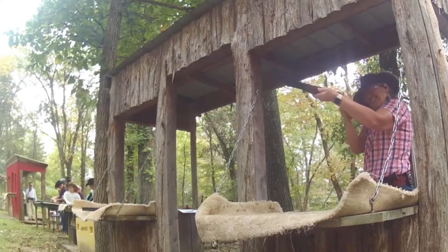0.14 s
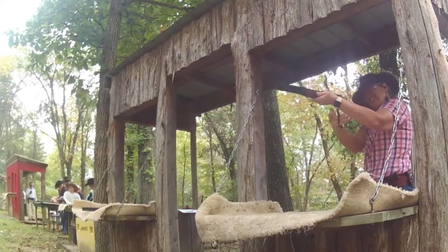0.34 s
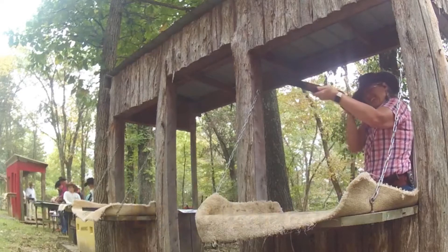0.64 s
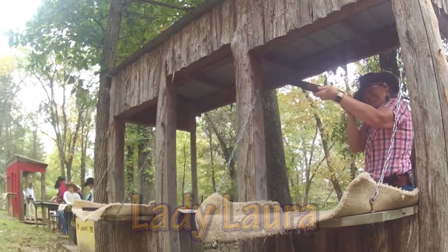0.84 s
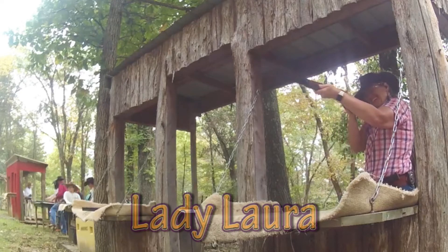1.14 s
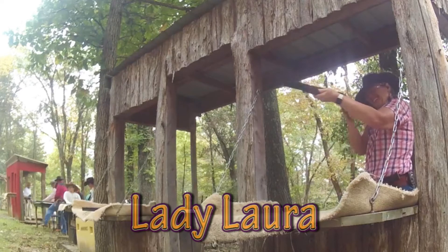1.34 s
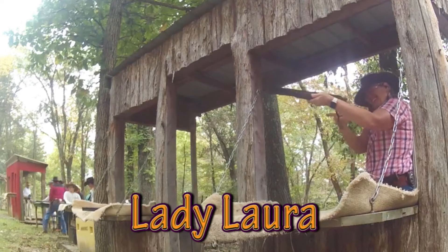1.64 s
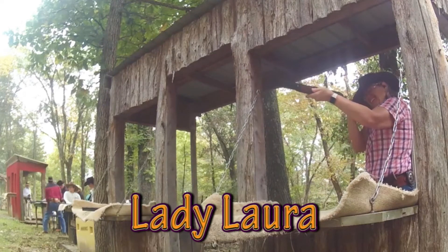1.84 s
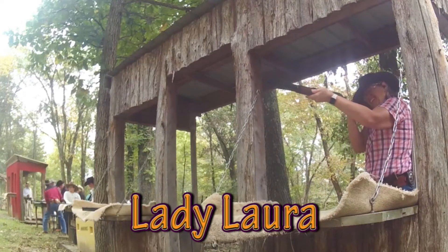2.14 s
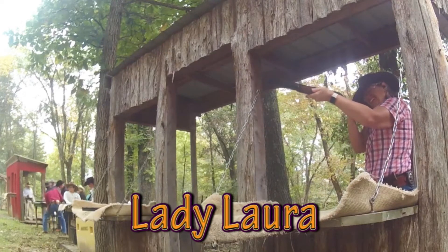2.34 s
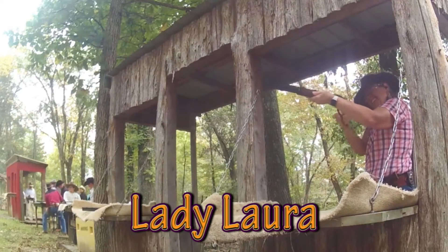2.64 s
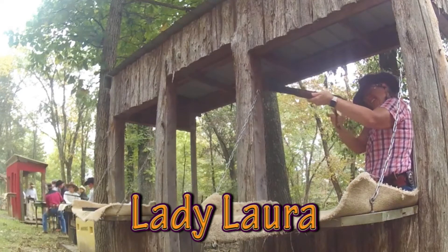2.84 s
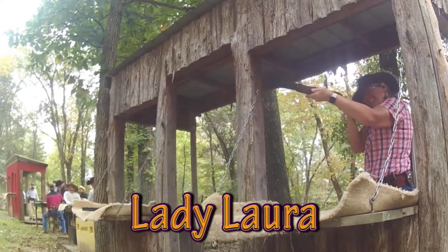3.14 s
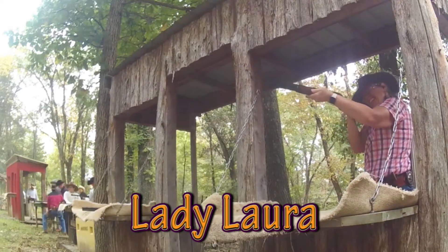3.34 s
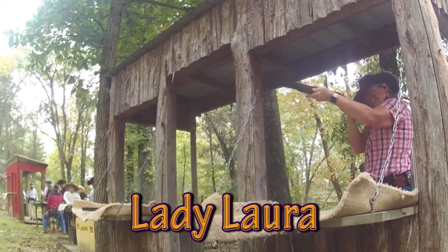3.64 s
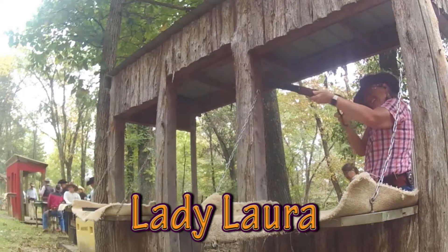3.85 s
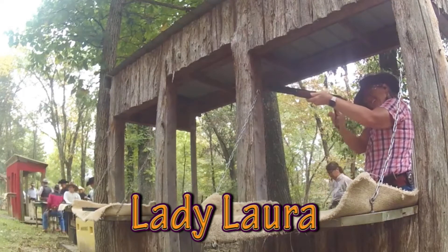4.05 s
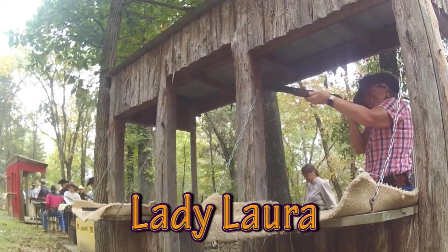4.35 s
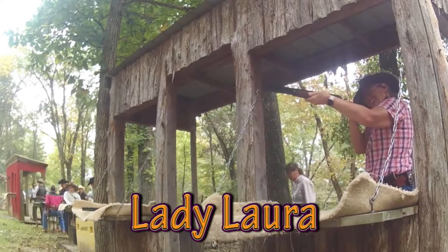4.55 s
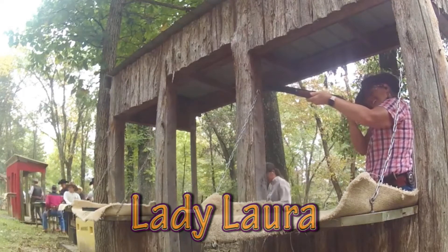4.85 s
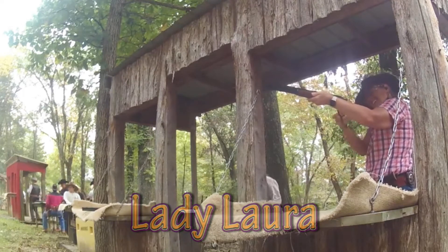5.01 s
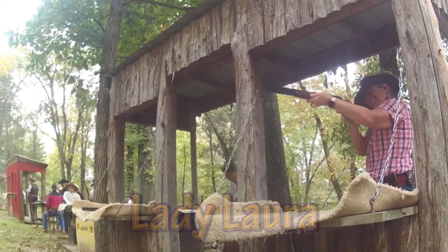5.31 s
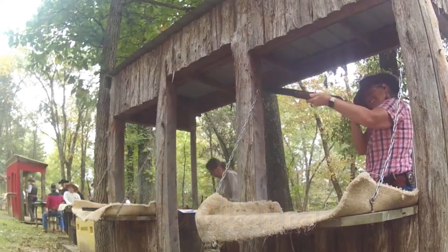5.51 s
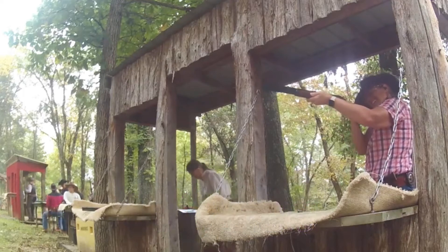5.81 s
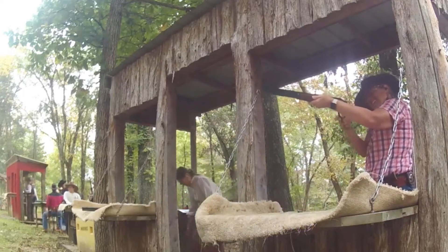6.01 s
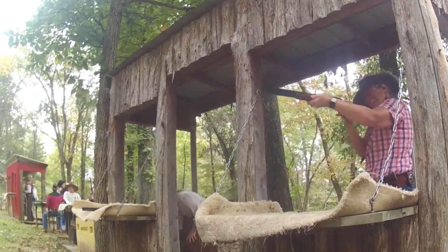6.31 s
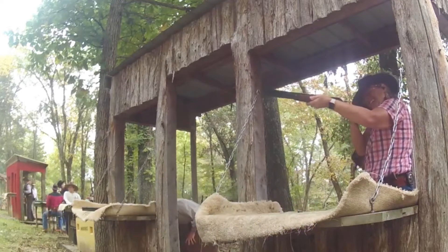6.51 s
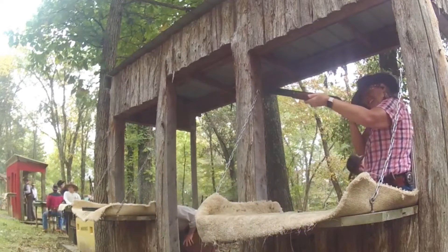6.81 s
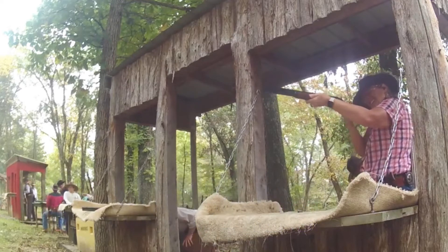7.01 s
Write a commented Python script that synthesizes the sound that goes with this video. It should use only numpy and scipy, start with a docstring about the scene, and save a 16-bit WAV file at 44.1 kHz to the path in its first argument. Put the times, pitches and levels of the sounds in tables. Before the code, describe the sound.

Close to a rifle in a timber shooting booth, a small boxed-in microphone clips on seven evenly spaced blasts. The first starts most subdued, later ones punchier. Each brings booth slaps, a quick ringing steel plate and a fading forest echo. Double metal clacks of the lever and bolt come before every next shot, over faint leafy wash and low hum. A faint distant gliding tone precedes the last shot.

```python
"""In a wood that washes quietly under a faint low hum, a lever-action rifle fires seven times from a
wooden booth. Each blast (a pulse, coloured noise) overloads a small cased camera's microphone; slaps off the
booth and a long tail from the trees follow, then a steel plate rings (decaying sines), with one dull far echo.
Before the next shot the lever clacks (short noise, ringing steel), with soft bumps of noise here and there.
A faint, short gliding tone sounds far off just before the last shot."""
import sys
import numpy as np
from scipy import signal
from scipy.fft import rfft, irfft
from scipy.io import wavfile

SR = 44100
rng = np.random.default_rng(int(sys.argv[2]) if len(sys.argv) > 2 else 0)


def bounce(signal):
    """Save signal as a 16-bit WAV file at the path given by the first command-line argument."""
    frames = np.transpose(np.atleast_2d(signal))
    limited = np.clip(frames, -1, 1)
    pcm = np.round(limited * 32767).astype(np.int16)
    wavfile.write(sys.argv[1], SR, pcm)


N = 316197


def gain_of(db):
    """Decibels to amplitude."""
    return 10 ** (np.asarray(db) / 20)


def evened(x):
    """Scales to rms 1."""
    return x / np.sqrt(np.mean(abs(x) ** 2) + 1e-20)


def read(points, hz):
    """Reads a curve of (f/Hz, value) on a log-frequency axis."""
    f, value = np.transpose(points)
    return np.interp(np.log(hz + 1), np.log(f), value)


def add(mix, s, sound):
    """Mixes a sound in at time s."""
    part = mix[max(round(s * SR), 0):][:len(sound)]
    part += sound[:len(part)]


def noise(points, size, dull_db=0):
    """Noise of rms 1 with a given spectrum, tilted down towards dull_db an octave well above 200 Hz."""
    hz = np.fft.rfftfreq(size, 1 / SR)
    level_db = read(points, hz) - dull_db * np.log2(1 + hz / 200)
    return evened(irfft(rfft(rng.standard_normal(size)) * gain_of(level_db), size))


def drift(size, rate):
    """Slow chance of rms 1, changing about rate times a second."""
    hz = np.fft.rfftfreq(size, 1 / SR)
    return evened(irfft(rfft(rng.standard_normal(size)) * np.exp(-(hz / rate) ** 2), size))


def colour(x, points, size=4096):
    """Causal minimum-phase filter with a given spectrum."""
    hz = abs(np.fft.fftfreq(size, 1 / SR))
    log_gain = np.log(gain_of(read(points, hz)))
    taps = np.fft.ifft(np.exp(np.conj(signal.hilbert(log_gain)))).real
    return signal.oaconvolve(x, taps[:size // 2])[:len(x)]


# Wash of the woods all around, relative spectrum: f/Hz, level/dB per Hz
WOODS_SPECTRUM = [(30, -32), (120, -20), (280, -32), (620, -9.5), (1000, -10), (1600, -12), (2050, -3),
                  (3300, -18.5), (4300, -18.5), (7000, -23), (10000, -23), (15000, -34.5)]
# Low hum, each line fading in and staying: start t/s, fade-in t/s, f/Hz, level/dB
HUM_LINES = [(0.4, 1.9, 114.8, -69.5), (5.05, .12, 208, -66)]


def background(woods_db=-55.0, swell_db=2.0):
    """The woods as coloured noise, swelling slowly by chance, and a faint low hum of steady sines."""
    t = np.arange(N) / SR
    out = noise(WOODS_SPECTRUM, N) * gain_of(woods_db + swell_db * drift(N, 5))
    for start_s, fade_s, hz, db in HUM_LINES:
        fade_in = np.clip((t - start_s) / fade_s, 0, 1)
        out += gain_of(db) * fade_in * np.sin(2 * np.pi * hz * t)
    return out


def far_tone(s=6.65, length_s=0.13, hz=585, arch_hz=32, db=-36):
    """A faint, short tone far off: a sine whose pitch and level rise and fall in one arch."""
    arch = np.sin(np.pi * np.linspace(0, 1, int(length_s * SR)))
    phase = 2 * np.pi * np.cumsum(hz + arch_hz * arch) / SR
    out = np.zeros(N)
    add(out, s, gain_of(db) * arch ** 2 * np.sin(phase))
    return out


# Soft knocks between shots: t/s, level/dB, rise t/s, t60/s, dullness/dB per octave
KNOCK_EVENTS = [(.864, -36, 0.0066, 0.1, 25), (2.316, -34.5, 0.012, 0.27, 9), (2.380, -29, 0.0042, 0.13, 6),
                (3.480, -38, .001, 0.09, 9.5), (3.520, -34, 0.0023, 0.15, 9),
                (3.613, -39.5, 0.0017, 0.13, 3)]
# Relative spectrum of a knock before its dulling: f/Hz, level/dB per Hz
KNOCK_SPECTRUM = [(100, -51), (260, -20), (600, 5.5), (1000, -5.5), (1500, -4), (2050, 15), (3400, 0.5),
                  (4300, -2), (7000, -38), (15000, -35)]


def knocks():
    """Soft, blunt bumps: noise with a rounded onset that dies quickly."""
    out, t = np.zeros(N), np.arange(SR // 2) / SR
    for s, db, rise_s, t60, dull_db in KNOCK_EVENTS:
        envelope = gain_of(db - 60 * t / t60) * (1 - np.exp(-t / rise_s))
        add(out, s, envelope * noise(KNOCK_SPECTRUM, len(t), dull_db))
    return out


# Snap of steel on steel, relative spectrum: f/Hz, level/dB per Hz
STEEL_SPECTRUM = [(120, -57), (300, -25.5), (700, -4), (1500, -1), (2400, 9.5), (3400, -8.5), (4500, -6),
                  (6500, -15), (10000, -10), (11300, -32), (12500, -18.5), (16000, -36.5)]
# Ring of the action's steel parts: f/Hz, t60/s, relative level/dB
ACTION_MODES = [(2095, 0.099, -5.5), (2500, 0.084, -5.5), (2900, 0.083, -12), (3900, 0.11, -15.5),
                (4260, .09, -16.5), (11400, 0.23, -26)]


def clack(db, snap_t60=0.018, booth_db=-11, booth_t60=0.23, rise_s=0.0013, ring_db=-1.5, vary_db=4,
          waver=.3, waver_rate=50):
    """A steel part snaps against its stop and rings unevenly, never twice alike; the booth adds a tail."""
    t = np.arange(SR // 2) / SR
    snap_and_booth = gain_of(-60 * t / snap_t60) + gain_of(booth_db - 60 * t / booth_t60)
    snap = noise(STEEL_SPECTRUM, len(t)) * snap_and_booth
    ring = np.zeros(len(t))
    for hz, t60, level in ACTION_MODES:
        mode_db = ring_db + level + vary_db * rng.uniform(-1, 1)
        ring += gain_of(mode_db - 60 * t / t60) * np.sin(2 * np.pi * (hz * t + rng.random()))
    ring *= 1 + waver * drift(len(t), waver_rate)
    return gain_of(db) * (1 - np.exp(-(t / rise_s) ** 2)) * (snap + ring)


# Cycles of the lever: bolt shuts t/s, level/dB, lever latches t/s, level/dB
LEVER_CYCLES = [(.640, -19, .674, -25), (1.910, -24.5, 1.9415, -24), (3.1175, -21, 3.1525, -28),
                (4.297, -26.5, 4.339, -25.5), (5.458, -22, 5.4985, -27.5), (6.471, -21.5, 6.5115, -31)]
OPEN_LEAD_S, OPEN_DB = .262, -28.5  # the lever is thrown open this long before the bolt shuts
FEED_S, FEED_DB = .07, -37.5  # the cartridge rattles within this time before the bolt shuts


def lever(count=3):
    """Each cycle: lever thrown open, a cartridge rattles up, the bolt slams shut and the lever latches."""
    out = np.zeros(N)
    for shut_s, shut_db, latch_s, latch_db in LEVER_CYCLES:
        add(out, shut_s - OPEN_LEAD_S, clack(OPEN_DB))
        for place in (np.arange(count) + rng.random(count)) / count:
            add(out, shut_s - FEED_S * place, clack(FEED_DB))
        add(out, shut_s, clack(shut_db))
        add(out, latch_s, clack(latch_db))
    return out


# Crowd of weak overtones that every plate has: f/Hz, typical level of one mode/dB, relative
OVERTONE_LEVELS = [(1700, -36.5), (2400, -28), (3000, -38.5), (3500, -39.5), (4100, -22.5), (4700, -37),
                   (6500, -43.5)]


def overtones(count=36, low_hz=1700, high_hz=6800):
    """Weak plate modes at chance pitches, spread evenly over the octaves: rows f/Hz, level/dB."""
    place = (np.arange(count) + rng.random(count)) / count
    hz = low_hz * (high_hz / low_hz) ** place
    return np.column_stack([hz, read(OVERTONE_LEVELS, hz) + 3 * rng.standard_normal(count)])


# How long plate modes ring: f/Hz, t60/s
PLATE_T60 = [(430, 1.3), (900, 1.19), (1400, 1.05), (1850, 1.42), (2150, 1.29), (2700, 1.14), (4200, 1.087),
             (14000, 1.2)]


def plate(modes, strike_db=-1.0, waver=0.31, hard_db=10, hard_s=0.18):
    """A struck steel plate: it sheds its first violent swing quickly; overlapping echoes make modes waver."""
    t, knots = np.arange(3 * SR // 2) / SR, np.linspace(0, 3 / 2, 30)
    ring = np.zeros(len(t))
    for hz, db in modes:
        wander = waver * rng.standard_normal((2, len(knots)))
        size, phase = (np.interp(t, knots, row) for row in wander)
        swing = np.sin(2 * np.pi * (hz * t + rng.random()) + phase)
        ring += gain_of(db - 60 * t / read(PLATE_T60, hz)) * (1 + size) * swing
    return gain_of(strike_db + hard_db * np.exp(-(t / hard_s) ** 2)) * ring


def case_buzz(db=2, t60=0.32, hz=3180, width_hz=200):
    """The pressure step sets the camera's case buzzing for a moment: a narrow band of noise."""
    t = np.arange(SR // 2) / SR
    swing = drift(len(t), width_hz) + 1j * drift(len(t), width_hz)
    return gain_of(db - 60 * t / t60) * (swing * np.exp(2j * np.pi * hz * t)).imag


def burst(spectrum, db, t60, rise_s):
    """A swell of coloured noise that dies away."""
    t = np.arange(SR) / SR
    return gain_of(db - 60 * t / t60) * (1 - np.exp(-t / rise_s)) * noise(spectrum, len(t))


# Fading of the echoes, in age stretched by each shot's length factor:
# a hold, then losses for each doubling of that age and for each second of it
ECHO_HOLD_S, SPREAD_DB_PER_DOUBLING, ABSORB_DB_PER_S = .1, 9.5, 22


def echo_fade_db(age):
    """Level of the echoes: steady while the nearest trunks answer, then lost to spreading and absorption."""
    age = np.maximum(age, ECHO_HOLD_S)
    spreading = SPREAD_DB_PER_DOUBLING * np.log2(age / ECHO_HOLD_S)
    return -spreading - ABSORB_DB_PER_S * (age - ECHO_HOLD_S)


# The blast as the woods return it, relative spectrum: f/Hz, level/dB per Hz
WOODS_RETURN = [(100, -52), (280, -31.5), (630, -5), (800, -14), (1100, -17), (1400, -10), (1650, -17.5),
                (2030, -3), (2700, -7.5), (3400, -21), (4200, -11), (5400, -33), (10500, -30),
                (15000, -57.5)]
# Fading added to the echoes by pitch: f/Hz, extra loss/dB per s
ECHO_AIR_LOSS = [(100, 10), (630, -7.5), (1200, 1.5), (2100, 0), (4000, 5), (12000, 5)]
# First slaps off the booth, broader and brighter, relative spectrum: f/Hz, level/dB per Hz
SLAP_SPECTRUM = [(100, -27), (300, -28), (600, -2.5), (900, -7), (1400, 4), (2000, 11), (2700, 1.5),
                 (3250, 3), (3900, -2), (5000, -21), (15000, -35.5)]


def blast(db, length, lumps_db=1.0, lumps_rate=70, crack_db=10, crack_s=0.0004, slap_db=3, slap_t60=0.38,
          echoes_db=-1.5):
    """The muzzle pulse, slaps off the booth, then tree echoes whose balance of pitch shifts as they fade."""
    t = np.arange(2 * SR) / SR
    hz, age, cells = signal.stft(noise(WOODS_RETURN, len(t)), SR, nperseg=512)
    air_gain = gain_of(-read(ECHO_AIR_LOSS, hz)[:, None] * age)
    echoes = signal.istft(cells * air_gain, SR)[1][:len(t)]
    # trunks return the sound in clumps
    lumps = lumps_db * drift(len(t), lumps_rate)
    echoes *= gain_of(echoes_db + echo_fade_db(t / length) + lumps)
    echoes *= np.minimum(2 * (2 - t), 1)  # fade out over the last half second
    crack = gain_of(crack_db) * (1 - t / crack_s) * np.exp(-t / crack_s)
    slap = gain_of(slap_db - 60 * t / slap_t60) * noise(SLAP_SPECTRUM, len(t))
    return gain_of(db) * (echoes + crack + slap)


# Shots from the booth, before the overload: t/s, blast level/dB, factor on the length of the echoes
SHOT_EVENTS = [(0.0237, 7, 0.91), (1.2186, 3, 1.018), (2.4622, 2, 1.042), (3.6340, 1, 1.077),
               (4.7633, 2.5, 1.048), (5.8263, 2.5, 1.08), (6.9428, 4.5, 1.09)]
# Steel plates: first row the modes f/Hz, then one row a hit, relative level/dB of each mode;
# where the bullet lands sets how strongly each mode rings
FIRST_PLATE = [
    [891, 1350, 1805, 1935, 2020, 2054, 2160, 2296, 2705, 2892, 3097, 3828, 4335, 4695],
    [-10, -23, -16, -20, -17, -11, -12, -8, -19, -17, -26, -27, -21, -26],
    [-17, -23, -22, -17, -19, -18, -14, -12, -19, -20, -23, -14, -22, -25],
]
SECOND_PLATE = [
    [905, 1593, 1988, 2050, 2175, 2315, 2425, 2680, 3145, 3591, 4170, 4380, 4925],
    [-23, -24, -14, -17, -18, -22, -18, -18, -26, -26, -19, -24, -28],
]
THIRD_PLATE = [
    [905, 1290, 1975, 2019, 2175, 2439, 2935, 3149, 3591, 3704, 4371],
    [-31, -28, -18, -9, -20, -21, -22, -27, -25, -23, -24],
]
FOURTH_PLATE = [
    [430, 757, 1238, 1776, 1900, 1995, 2131, 2346, 2388, 2509, 2600, 2693, 2790, 3564, 3700, 3950, 4129],
    [-32, -22, -18, -16, -19, -18, -13, -18, -17, -20, -20, -28, -28, -27, -19, -25, -24],
    [-25, -21, -27, -20, -5, -16, -12, -15, -24, -19, -25, -28, -13, -28, -28, -21, -19],
    [-24, -25, -15, -14, -16, -6, -7, -18, -18, -19, -22, -6, -15, -25, -16, -24, -19],
]
PLATES_AS_SHOT = [FIRST_PLATE, SECOND_PLATE, THIRD_PLATE, FOURTH_PLATE]
FLIGHT_S = .095  # bullet out and ring back
# Echo dulled by distance, relative spectrum: f/Hz, level/dB per Hz
FAR_ECHO_SPECTRUM = [(150, -34), (400, -26), (620, 11), (850, -12), (1400, -26.5), (2000, -18),
                     (3500, -27.5), (8000, -59.5)]


def shooting(splat_db=6, splat_t60=0.24, splat_lead_s=.02, far_s=.262, far_db=-15, far_t60=0.11):
    """Every shot: blast, case buzz, the bullet's splat, its plate's ring and one dull echo from far off."""
    out, hits = np.zeros(N), []
    for hz, *strikes in PLATES_AS_SHOT:
        weak = overtones()  # a plate keeps its overtones from hit to hit
        for levels in strikes:
            hits.append(np.vstack([np.column_stack([hz, levels]), weak]))
    for (s, db, length), modes in zip(SHOT_EVENTS, hits):
        add(out, s, blast(db, length))
        add(out, s, case_buzz())
        add(out, s + FLIGHT_S - splat_lead_s, burst(SLAP_SPECTRUM, splat_db, splat_t60, rise_s=0.0063))
        add(out, s + FLIGHT_S, plate(modes))
        add(out, s + far_s, burst(FAR_ECHO_SPECTRUM, db + far_db, far_t60, rise_s=0.011))
    return out


def scene():
    """Sound pressure at the camera."""
    return (background() + far_tone() + knocks() + lever() + shooting())[None]


# Subdued start of a blast: its length, its depth at time 0, when it would have worn off
HELD_S, HELD_DB, HELD_GONE_S = .0428, -19.5, 7.56


def subdued_starts():
    """Gain that holds down the start of each blast, less and less until the last is nearly whole."""
    t = np.arange(N) / SR
    starting = sum((t > s - 1 / SR) & (t < s + HELD_S) for s, _, _ in SHOT_EVENTS)
    opening = np.interp(t, [0, HELD_GONE_S], [gain_of(HELD_DB / 2), 1]) ** 2
    return np.where(starting, opening, 1)


# Colour of the camera after its microphone overloads: f/Hz, gain level/dB
CAMERA_COLOUR = [(30, -5.5), (300, -7.5), (630, -4.5), (900, -3), (1600, -3), (2000, 0), (2500, -4.5),
                 (3150, -5.5), (4000, -15), (5000, -21), (6400, -36.5), (8000, -41.5), (10000, -22.5),
                 (15500, -24)]
EDGE_HZ = 15900  # top of the camera's band


def record(dry, ceiling_db=-6.5):
    """The microphone overloads, the camera rounds and smears the flat tops, and shots start subdued."""
    x = dry[0]
    knee = 7  # higher bends more sharply into the ceiling
    clipped = x / (1 + abs(x / gain_of(ceiling_db)) ** knee) ** (1 / knee)
    out = colour(clipped * subdued_starts(), CAMERA_COLOUR)
    # an all-pass delays the middle of the band a little, so the peaks come out uneven
    radius, smear_hz = .9, 2300
    poles = [1, -2 * radius * np.cos(2 * np.pi * smear_hz / SR), radius ** 2]
    out = signal.lfilter(poles[::-1], poles, out)
    low_pass = signal.firwin(511, EDGE_HZ, window=("kaiser", 9), fs=SR)
    return signal.oaconvolve(out, low_pass, "same")[None]


dry = scene()
out = record(dry)
bounce(out)
```